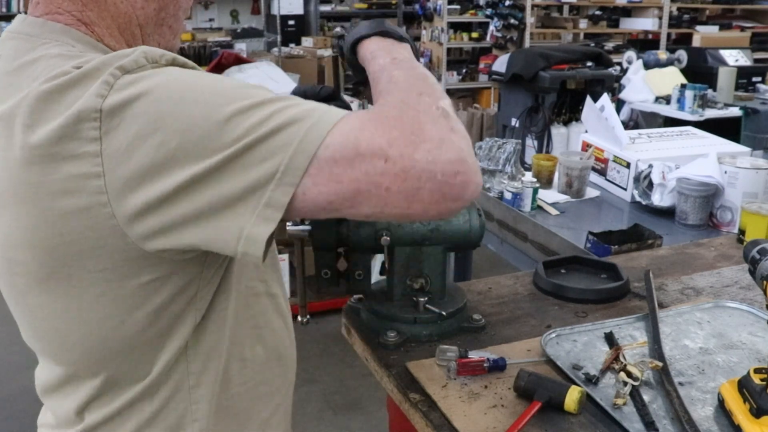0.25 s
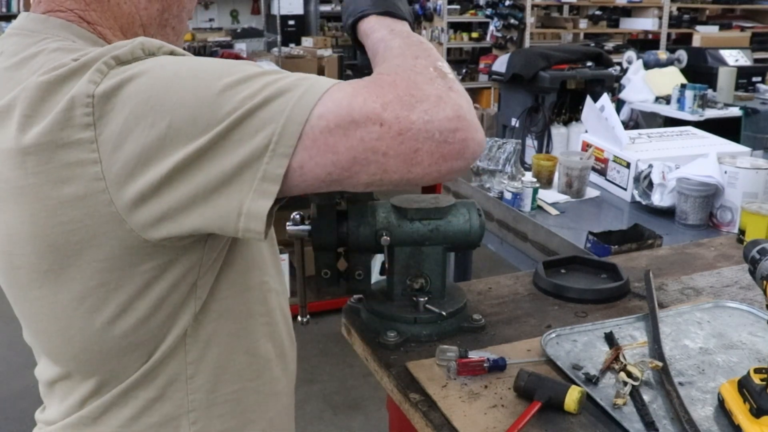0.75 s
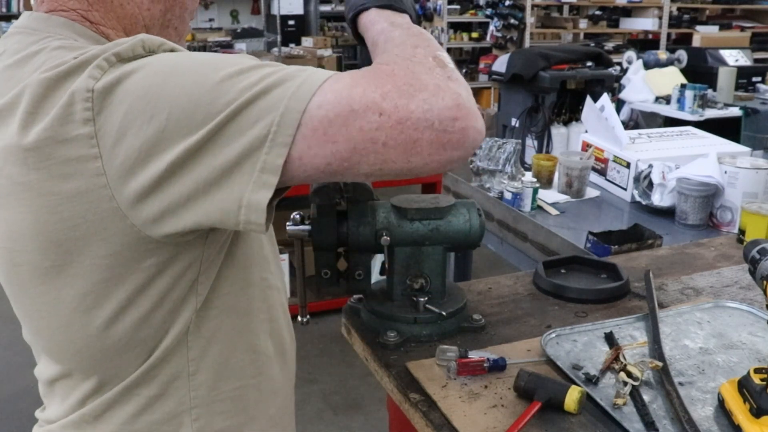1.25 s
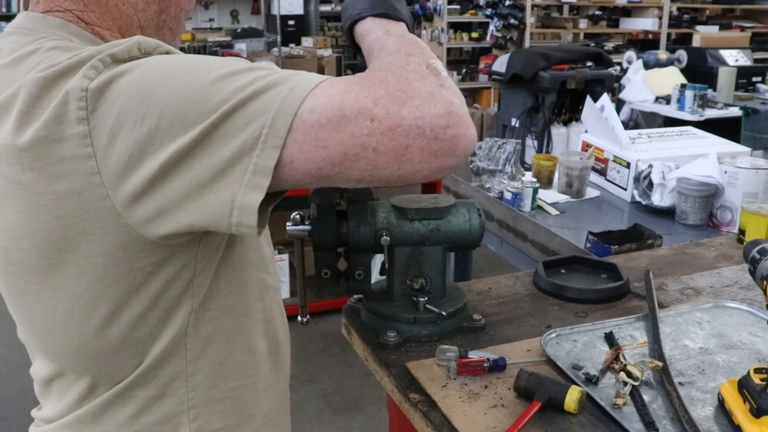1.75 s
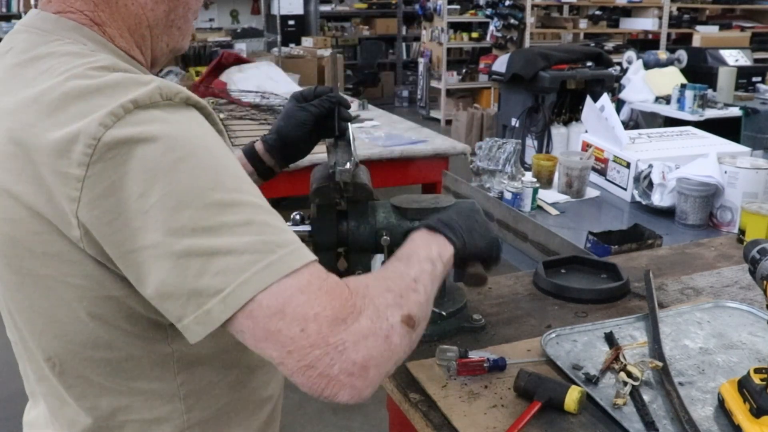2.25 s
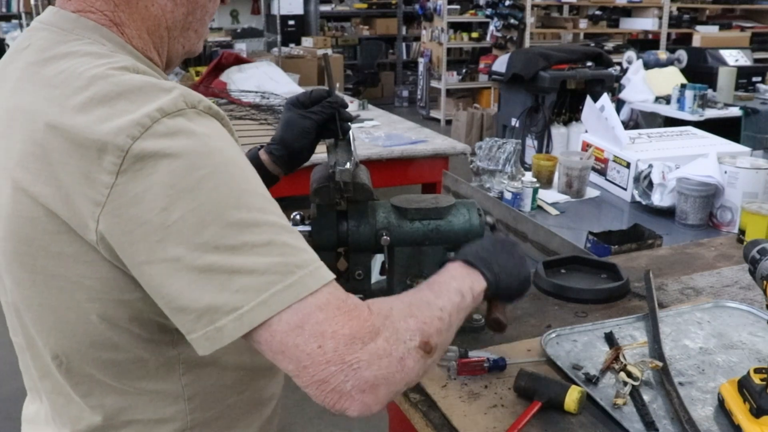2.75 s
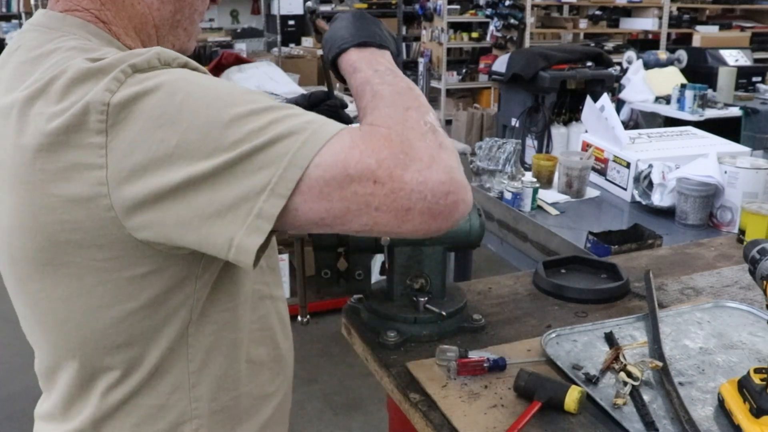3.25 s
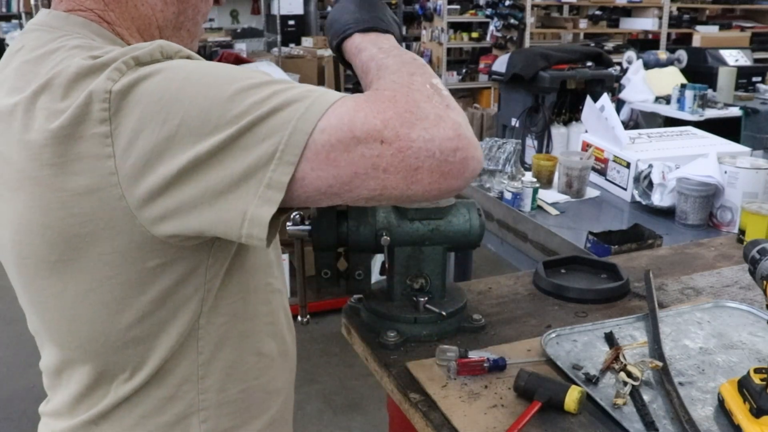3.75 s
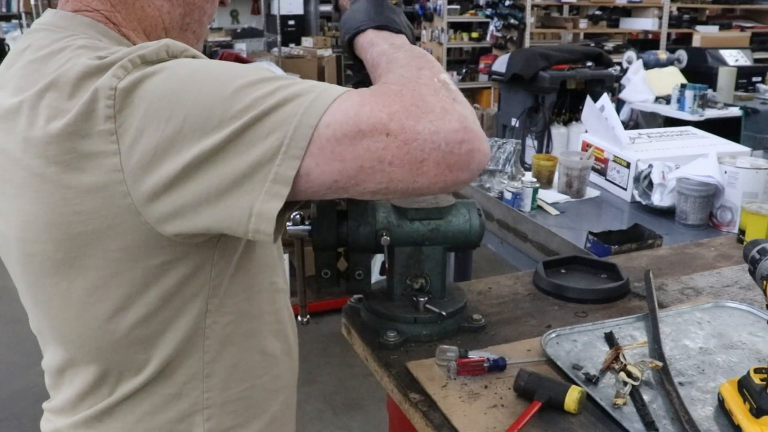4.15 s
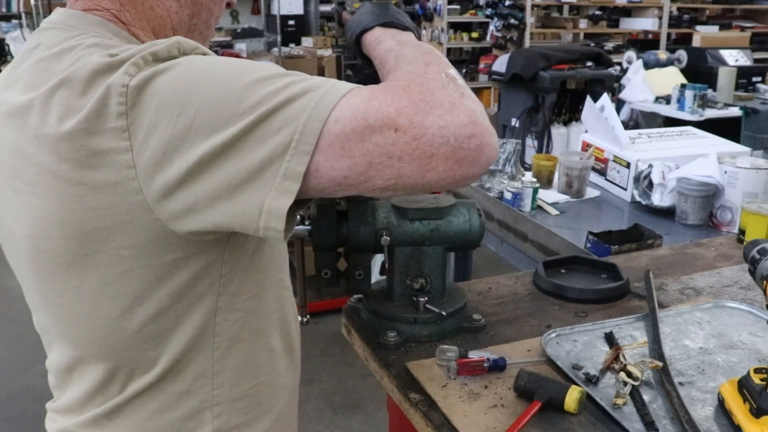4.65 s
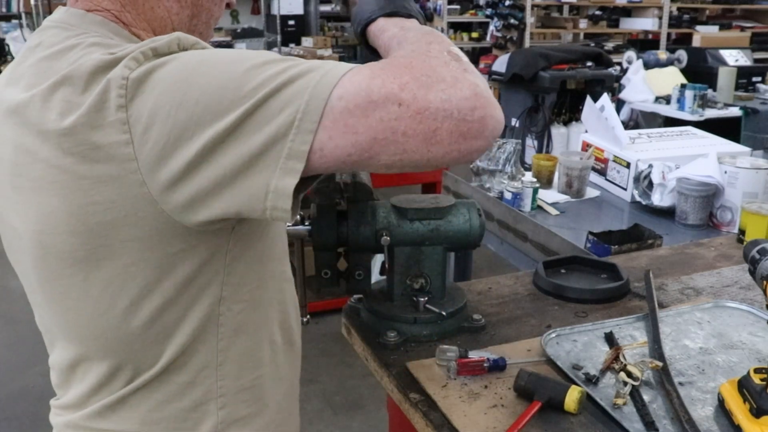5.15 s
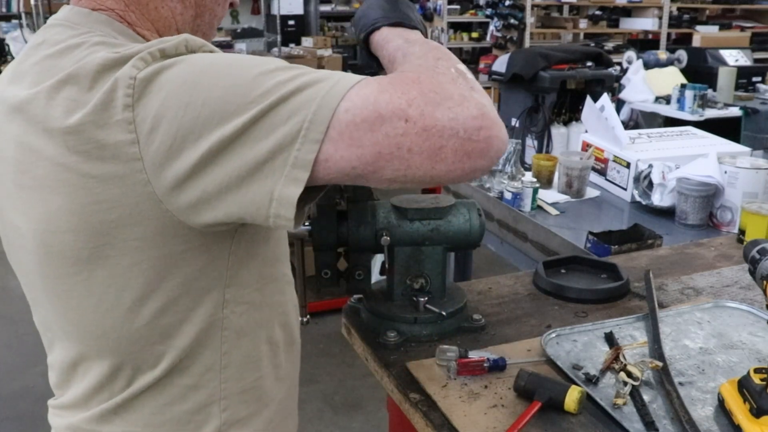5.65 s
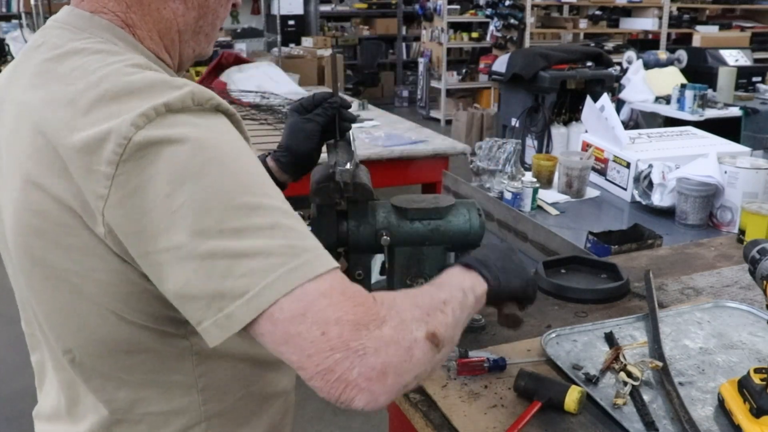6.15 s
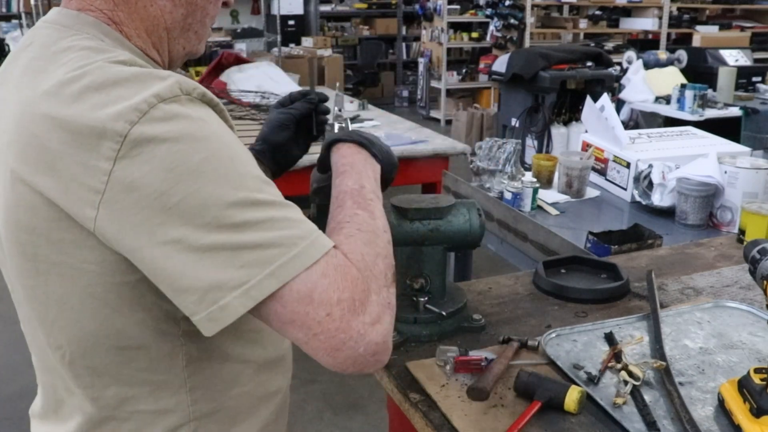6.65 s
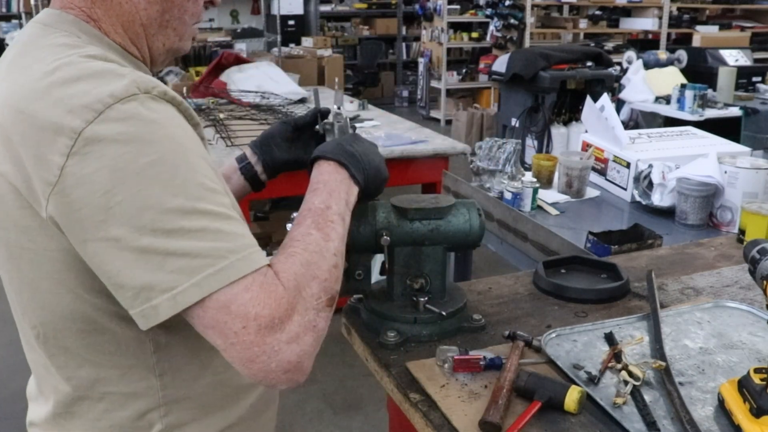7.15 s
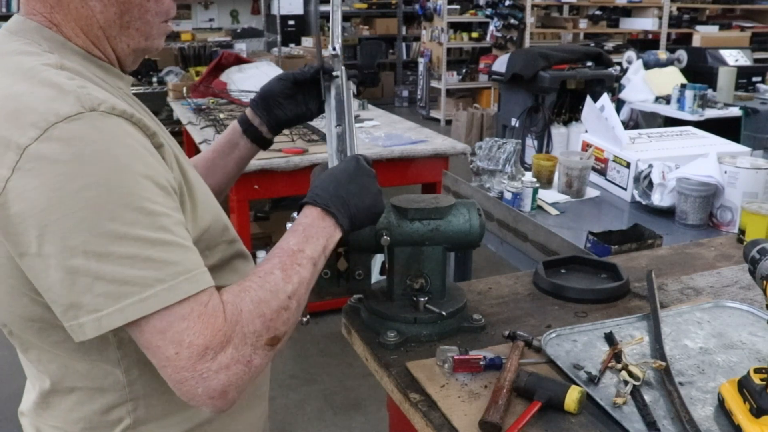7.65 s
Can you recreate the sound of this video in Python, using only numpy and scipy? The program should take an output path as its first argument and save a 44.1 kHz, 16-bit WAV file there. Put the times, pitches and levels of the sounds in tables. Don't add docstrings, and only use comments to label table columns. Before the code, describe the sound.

Loud, dry steel-on-steel blows, about four a second, each with a bench thump and a short hall tail, come in two bursts separated by a gap. Then a hammer clatters down among loose hardware, small metal pieces knock together, and a sliding vise bar gives a few quiet clear tinks. The close microphone distorts on the blows; far behind are air hiss and a low engine drone.

```python
import sys
import numpy as np
from scipy import signal
from scipy.fft import rfft, irfft
from scipy.io import wavfile
from scipy.ndimage import uniform_filter1d, map_coordinates

SR = 44100
rng = np.random.default_rng(int(sys.argv[2]) if len(sys.argv) > 2 else 0)


def master(y):
    cut = np.clip(np.atleast_2d(y).T, -1, 1)
    pcm = np.round(cut * 32767)
    wavfile.write(sys.argv[1], SR, pcm.astype(np.int16))


def volts_from_db(level):
    exponent = np.asarray(level, float) / 20
    return 10 ** exponent


N = 348651

# f/Hz, level/dB, t60/s
BENCH_MODES = [(105, -17.5, 1.8), (154.4, -12, 1.7), (231.3, -11, 0.76), (306, -3.5, 0.13), (327, 5, 0.051),
               (355.2, 0, 0.41), (417, -4, 0.54), (629, -11, 0.35), (784, -7.5, 0.095)]
# f/Hz, level/dB
CONTACT_COLOUR = [(600, -11), (1500, -3), (3500, 1.5), (7000, -4.5), (12000, -18.5), (16000, -28.5)]


def hammer(out):
    # t/s, strength/dB, rivet seated/0-1, face slanted/0-1, pitch of the spot struck f/Hz
    blows = [(0.3042, -6.5, 0.2, .39, 5330), (0.6153, -4.5, 0.1, 0.4, 5300), (0.8905, -2, .45, .93, 5095),
             (1.1564, -2.5, 0.9, .47, 5370), (1.4052, -2, .93, .25, 5250), (1.6519, -1.5, 0.92, 0.2, 5640),
             (1.8826, -1.44, .99, 0.1, 4510), (3.6102, -16, 0.89, 0.4, 4140), (3.903, -4, 0.03, .25, 5280),
             (4.583, -16.5, 0.3, 0.7, 4450), (4.8955, -3.5, .07, .16, 5400), (5.1259, -1.92, 0.2, 1, 5220),
             (5.3542, -2.15, .46, 1, 5200), (5.6012, -2.5, 0.7, 0.5, 5650), (5.8052, -2.1, .76, .58, 5500)]
    takes = {"vise": (-23.5, 1.5, 6, -1.5), "jaw": (-19.5, 2.16, 7.5, -1.5),
             "part": (-10.5, 1.23, -.7, -11.5), "punch": (-12, 1.48, -1, 0), "rivet": (-15, 1.7, 9.5, -4),
             "shank": (-14.5, 1.9, 3.8, -10), "edge": (-27, 1.05, -0.8, 2.3), "head": (-3, 1.5, -19, -7),
             "bench": (-27.5, 0.49, -3, 0), "spot": (-6.5, 1.2, 4.85, 9.5), "flank": (-11, 1.07, 2.25, -7),
             "hall": (-11.5, 0.36, 0.3, 1.47)}
    # f/Hz, level/dB, t60/s
    vise_modes = [(1040, -2, 0.099), (950, -16.5, 0.021), (1330, -4, 0.022)]
    jaw_modes = [(1600, -7, 0.03), (1737, -0.5, 0.014), (1956, -0.5, 0.015), (2250, -2, 0.0098)]
    part_modes = [(2710, 0.97, 0.0095), (3050, 1, 0.017), (3380, -1.4, 0.012), (3743, 0.7, .012)]
    punch_modes = [(4190, -7, 0.025), (4550, -2, 0.012), (4800, -7, 0.035), (5500, 5.5, 0.0085),
                   (5870, -1.5, 0.0076)]
    rivet_modes = [(6220, -5, 0.0053), (6938, -1, 0.0067), (7580, -2.5, 0.0069), (8448, -4.5, 0.013)]
    shank_modes = [(9550, -3.5, 0.01), (9400, -8, 0.013), (10370, 1, 0.0091)]
    edge_modes = [(11170, -0.5, 0.0074), (12250, 1.5, 0.007), (13300, -5, 0.011), (13600, -4.5, .008),
                  (14400, -8, .008)]
    head_modes = [(15480, 0, .015), (15700, -8, .01)]
    # f/Hz, level/dB, t60/s
    thud_modes = [(110, -8, 0.044), (176, -11.5, 0.042), (232, -12.5, 0.0066), (295, -4, 0.081),
                  (406, -3, 0.079), (590, -3, 0.023), (760, -2, 0.034)]
    # f/Hz, level/dB, t60/s
    tap_modes = [(1570, -7.5, .025), (1985, 1.5, 0.043), (2270, -4, 0.033), (2626, -4.5, 0.031),
                 (4300, -5.5, .025), (5500, -8.5, .012)]
    # f/Hz, shift when seated/Hz, shift when slanted/Hz, t60/s
    flank_modes = [(2569, -540, -645, .04), (3137, -155, -200, 0.032)]
    light_db = -10
    tap_db = -6.5

    parts = dict(vise=vise_modes, jaw=jaw_modes, part=part_modes, punch=punch_modes,
                 rivet=rivet_modes, shank=shank_modes, edge=edge_modes)
    t = np.arange(int(.05 * SR)) / SR
    choke = 1 / np.sqrt(1 + (t / 0.0033) ** 4)

    def push(modes):
        return ring(modes, .05, 0.00026, 1.0, detune=0.022)

    def clank(modes):
        first = push(modes)
        second = np.roll(push(modes), round(0.0023 * SR), axis=1)
        return unit(choke * (first + volts_from_db(-7.5) * second))

    for s, strength_db, seated, slanted, spot_hz in blows:
        db = {name: np.dot(rule, (1, strength_db, seated, slanted)) for name, rule in takes.items()}
        steel = sum(volts_from_db(db[name] - 7.0) * clank(modes) for name, modes in parts.items())
        steel += volts_from_db(db["head"]) * ring(head_modes, .05, .0005, .8)
        steel += volts_from_db(strength_db - 21.5) * crack(CONTACT_COLOUR, .05, 0.025)
        free = [(hz + seat_hz * seated + slant_hz * slanted, db["flank"] + 1.5, t60)
                for hz, seat_hz, slant_hz, t60 in flank_modes]
        free.append((spot_hz, db["spot"] + 3.0, .017))
        steel += volts_from_db(-8.0) * ring(free, .05, 0.00047, 0.9)
        if strength_db < light_db:
            steel += volts_from_db(strength_db + tap_db) * ring(tap_modes, .05, .0003, 1.5)
        thud = volts_from_db(db["bench"] + 3.5) * ring(thud_modes, .05, 0.00021, 0.43, detune=0.04)
        add(out, s, steel + thud, db["hall"])
        thump = volts_from_db(db["bench"] - 5.5) * ring(BENCH_MODES, 1, 0.0018, 0.67, detune=0.0098)
        out[:, round(s * SR):][:, :SR] += thump


def hardware(out):
    # t/s, peak/dB, rattle/dB, rattle t60/s, tilt/dB per octave
    drops = [
        (6.4669, -5, -15.5, 0.27, 0.5),
        (6.554, -14.5, -9, 0.1, 2),
        (6.5712, -19.5, -9.5, 0.18, -1.5),
        (6.6359, -26, -2.5, 0.17, -1.1),
        (6.8744, -35.5, -6.5, 0.16, -6),
        (7.0318, -38.5, -9, .12, -11.5),
    ]
    # f/Hz, density/dB per Hz
    scatter_colour = [(88, -50), (150, -6.5), (254, -8.5), (589, -3.5), (1200, 0), (4950, -1.5),
                      (12400, -12.5), (16000, -29.5)]
    pan_db = np.array([[-2.5], [2.5]])
    t = np.arange(int(.25 * SR)) / SR

    for s, db, rattle_db, t60, tilt_db in drops:
        def colour(hz, _):
            return volts_from_db(along(scatter_colour, hz) + tilt_db * np.log2(1 + hz / 1500))

        hiss = unit(noise(len(t), colour, [(300, 0.9), (5000, 0.83)], size=2048))
        grains = volts_from_db(2.5 * unit(uniform_filter1d(rng.standard_normal(len(t)), size=60)))
        slap = volts_from_db(-60 * t / .014)
        rattle = volts_from_db(rattle_db - 1.5 - 60 * t / t60) * grains
        shape = (.5 * slap + rattle) * (1 - np.exp(-(t / 0.00053) ** 2))
        thump = volts_from_db(db + rattle_db - 30.0) * ring(BENCH_MODES[:4], 1, 0.00063, 1.6, detune=0.02)
        out[:, round(s * SR):][:, :SR] += thump * volts_from_db(-90 * np.arange(SR) / SR)
        add(out, s, volts_from_db(db + pan_db) * shape * hiss, wet_db=-13, short=False)


def small_knocks(out):
    # t/s, peak/dB, low pitch f/Hz, high pitch f/Hz, left over right/dB
    knocks = [(0.086, -48, 774, 7400, -1), (6.398, -45.5, 693, 3050, -5), (6.734, -33, 1625, 2340, -6),
              (6.748, -19, 1160, 2840, -1), (6.755, -19.5, 1430, 2910, -6), (6.759, -25, 1040, 2920, 3),
              (6.792, -35, 1700, 3040, -3.0), (6.804, -36, 990, 2560, -2), (6.828, -17.5, 1520, 3320, -3),
              (6.841, -14, 1400, 3190, 2), (6.846, -14.5, 1030, 3240, -3), (6.92, -35.5, 1210, 1800, -1),
              (6.961, -47.5, 810, 3380, -0.5)]
    # f/Hz, level/dB
    dull_colour = [(300, -17.5), (900, -12), (2500, 13.5), (5000, 3), (7500, -5), (12000, -14),
                   (16000, -47.5)]
    t60 = .017
    for s, db, low_hz, high_hz, pan_db in knocks:
        overtone_db = -4 if high_hz > 3100 else -14
        modes = [(low_hz, -7, t60),
                 (high_hz, -5, 0.94 * t60),
                 (1.42 * high_hz, overtone_db, 0.7 * t60),
                 (0.43 * high_hz, -9, 0.69 * t60),
                 (0.47 * low_hz, -15, t60)]
        knock = ring(modes, .08, 0.0001, 0.89) + volts_from_db(-16.0) * crack(dull_colour, .08, 0.037)
        add(out, s, volts_from_db(db + pan_db * np.array([[.5], [-.5]])) * knock, wet_db=-22.5)


def handle(out):
    # t/s, peak/dB, ring of the bar relative/dB, brightness/dB
    tinks = [
        (7.1713, -31, -10, -6.5),
        (7.2923, -24.5, -16.5, -6.5),
        (7.3076, -37, -11, -12),
        (7.4667, -38.5, -17.5, -20),
        (7.5887, -30.5, -20, -25),
        (7.6118, -46.5, -6, -27),
        (7.746, -42.5, -14, -21),
    ]
    # f/Hz, level/dB, t60/s
    hub_modes = [(1460, -15.5, 0.044), (1945, -13.5, 0.04), (2930, -5.5, 0.015), (3500, 3.5, 0.0069),
                 (4160, 1, 0.0061), (4450, -5.5, 0.0078), (6540, 3, 0.0021), (8100, -8, 0.0034),
                 (11500, -18, 0.0063)]
    # f/Hz, level/dB, t60/s
    bar_modes = [(5329, -3, .33), (10340, -13, .16)]
    t = np.arange(SR // 2) / SR
    stops = [row[0] for row in tinks[1:]] + [N / SR]
    for (s, db, ring_db, bright_db), stop in zip(tinks, stops):
        body = ring(hub_modes[:6], .06, 0.000097, 0.81)
        bright = volts_from_db(bright_db + 16) * ring(hub_modes[6:], .06, 0.00018, 1.6)
        tap = volts_from_db(-3.0) * (body + bright) + volts_from_db(-26.5) * crack(CONTACT_COLOUR, .06, 0.0044)
        add(out, s, volts_from_db(db) * tap, wet_db=-16.5)
        bar = volts_from_db(db + ring_db) * ring(bar_modes, .5, 0.00052, 0.67)
        out[:, round(s * SR):][:, :len(t)] += bar * (t < stop - s)


def ring(modes, seconds, attack, spread_db, detune=0):
    # f/Hz, left over right/dB
    lean = [(240, -0.5), (480, 0.4), (950, 1), (1890, -2.0), (3770, -3), (7520, -4.5), (15000, 0.0)]
    # f/Hz, lead/rad
    lead_curve = [(400, 0.52), (1200, 0.54), (3000, 0.42), (8000, 0.89), (15000, .5)]
    # f/Hz, spread/rad
    stray_curve = [(300, .05), (1200, 0.25), (3000, 0.84), (8000, 1.3), (13000, 1.2), (15000, .3)]
    t = np.arange(int(seconds * SR)) / SR
    hz, db, t60 = np.transpose(modes)[:, :, None]
    level, start, shift, stray = rng.standard_normal((4, len(modes), 1))
    side = np.array([.5, -.5])[:, None, None]
    rise = 1 - np.exp(-(t / (attack * (1 + 2500 / hz))) ** 2)
    lead = along(lead_curve, hz) + stray * along(stray_curve, hz)
    waves = np.sin(2 * np.pi * hz * (1 + detune * shift) * t + 2 * start + side * lead)
    decay = volts_from_db(db + spread_db * level + side * along(lean, hz) - 60 * t / t60)
    return np.sum(decay * rise * waves, 1)


def crack(colour, seconds, t60):
    t = np.arange(int(seconds * SR)) / SR
    grit = unit(noise(len(t), lambda hz, _: volts_from_db(along(colour, hz)), [(500, 0.59), (5000, .6)]))
    return grit * volts_from_db(-60 * t / t60) * (1 - np.exp(-(t / 0.00033) ** 2))


def add(out, s, sound, wet_db, short=True):
    # t/s, left level/dB, right level/dB
    echoes = [(.0068, -17.5, -9.5), (.0117, -28.5, -20.5), (.0146, -23.5, -26), (.017, -20, -30),
              (.0208, -18.5, -23), (0.0301, -26, -23)]
    # f/Hz, t60/s
    hall_t60 = [(120, 0.93), (300, 0.43), (700, 0.4), (1800, 0.65), (4500, 0.84), (8000, 0.69),
                (11000, 0.5), (15500, 0.34)]
    # f/Hz, level/dB
    hall_colour = [(90, 8), (450, 8.5), (1000, -2.5), (1500, -5), (2500, -1.5), (11000, -8), (15300, -3.5),
                   (16200, -25)]
    # f/Hz, likeness/-1 to 1
    hall_alike = [(100, 1), (500, 0.86), (1500, 0.35), (4000, 0.1), (15000, 1)]

    def shape(hz, t):
        decay = volts_from_db(along(hall_colour, hz) - 60 * t / along(hall_t60, hz))
        return decay * (1 - .8 * np.exp(-(t / 0.034) ** 2)) * (t > .006)

    tail = noise(int(.9 * SR), shape, hall_alike)
    feed = all_round(sound, size=21) if short else sound
    wet = signal.fftconvolve(feed, tail * volts_from_db(wet_db) / np.linalg.norm(tail[0]), axes=1)
    out[:, round(s * SR):][:, :wet.shape[1]] += wet
    direct = (0.0006, 0.0059, 0.00066)
    for delay, left_db, right_db in [direct] + echoes:
        start = round((s + delay) * SR)
        out[:, start:][:, :sound.shape[1]] += volts_from_db(np.array([[left_db], [right_db]])) * sound


def all_round(sound, size):
    power = np.mean(np.abs(rfft(sound[:, :2048], 2048)) ** 2, 0)

    def blur(bins):
        return uniform_filter1d(uniform_filter1d(power, bins), bins)

    bass = np.exp(-(np.fft.rfftfreq(2048, 1 / SR) / 900) ** 2)
    spectrum = np.sqrt(np.abs(bass * blur(3) + (1 - bass) * blur(size)))
    return np.roll(irfft(spectrum), 256)[None, :512]


def shop():
    # f/Hz, density/dB per Hz
    vent_colour = [(12, -57), (20, -21), (76, -1.5), (97, -9.5), (330, -12.5), (734, -12), (2000, -29),
                   (2600, -71)]
    # f/Hz, density/dB per Hz
    hiss_colour = [(760, -30.5), (1300, -8.5), (2590, -6.5), (2820, -7.5), (3480, -10), (6440, -14),
                   (15400, -22), (16200, -38.5)]
    # f/Hz, likeness/-1 to 1
    air_alike = [(60, 0.99), (180, 0.97), (550, 0.89), (1650, -0.18), (4970, 0.59), (15000, 0.48)]
    # t/s, level/dB
    engine_level = [(0, -60), (.4, -54.5), (1.1, -54.5), (1.35, -62), (1.56, -55.5), (2.02, -54.5),
                    (2.2, -70.5), (2.5, -71), (2.58, -55), (3.08, -55), (3.22, -69), (3.6, -50.5),
                    (3.85, -56.5), (4.52, -49), (5.05, -56.5), (5.75, -62.5), (6.05, -73.5), (7.91, -62.5)]
    vent_db, hiss_db = -54.5, -66
    engine_hz, sag_hz_per_s = 77.5, .8
    t = np.arange(N) / SR
    vent = unit(noise(N, lambda hz, _: volts_from_db(along(vent_colour, hz)) * (hz < 4400), air_alike, size=4096))
    hiss = unit(noise(N, lambda hz, _: volts_from_db(along(hiss_colour, hz)), air_alike))
    pitch = engine_hz - sag_hz_per_s * t + 1.5 * wobble(11)
    drone = np.sqrt(2) * np.sin(2 * np.pi * np.cumsum(pitch) / SR)
    engine_db = np.interp(t, *np.transpose(engine_level)) + 1.3 * wobble(26) + 1.5 * wobble(7)
    air = volts_from_db(vent_db + .8 * wobble(1.7)) * vent + volts_from_db(hiss_db + .8 * wobble(2.2)) * hiss
    return air + volts_from_db(engine_db) * drone


def noise(count, gain, alike, size=512):
    hz, t, z = signal.stft(rng.standard_normal((2, count)), SR, nperseg=size)
    turn = np.arccos(np.clip(along(alike, hz), -1, 1))[:, None] / 2
    mid, side = z[0] * np.cos(turn), z[1] * np.sin(turn)
    shaped = np.array([mid + side, mid - side]) * gain(hz[:, None], t)
    return signal.istft(shaped, SR, nperseg=size)[1][:, :count]


def wobble(rate):
    knots = rng.standard_normal(int(N * rate / SR) + 4)
    return map_coordinates(knots, [np.arange(N) * rate / SR])


def along(points, hz):
    f, v = np.transpose(points)
    return np.interp(np.log(hz + 1), np.log(f + 1), v)


def unit(x):
    return x / np.sqrt(np.mean(x ** 2) + 1e-20)


def scene():
    out = np.zeros((2, N + 2 * SR))
    hammer(out)
    hardware(out)
    small_knocks(out)
    handle(out)
    return out[:, :N] + shop()


def roll_off(x):
    return signal.sosfilt(signal.butter(12, 16520, fs=SR, output="sos"), x)


def record(dry):
    clipped = dry / (1 + np.abs(dry) ** 6) ** (1 / 6)
    low_pass = signal.cheby2(10, 40, 16850, fs=SR, output="sos")
    mix = signal.sosfilt(low_pass, clipped)
    return roll_off(mix)


dry = scene()
out = record(dry)
master(out)
```